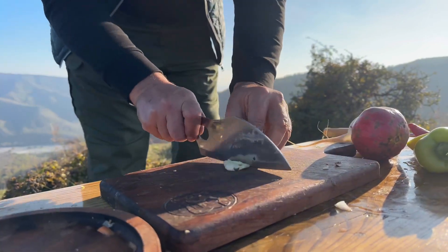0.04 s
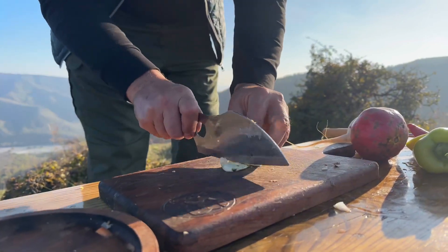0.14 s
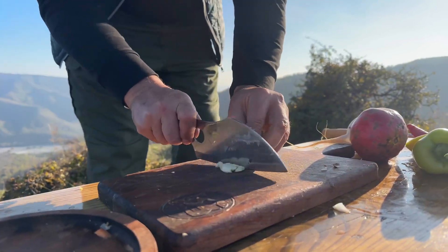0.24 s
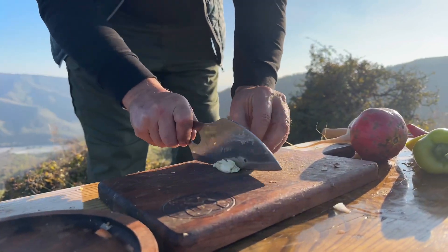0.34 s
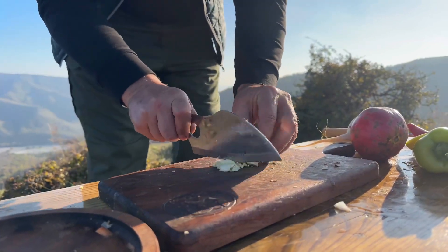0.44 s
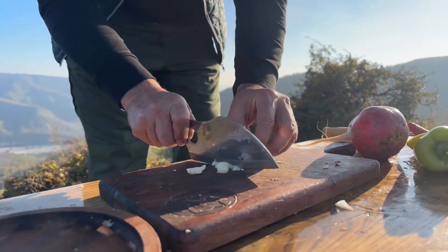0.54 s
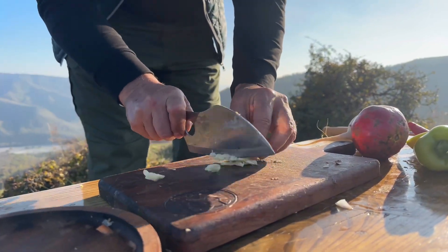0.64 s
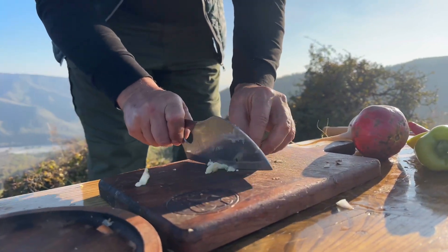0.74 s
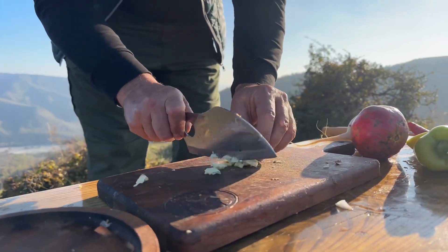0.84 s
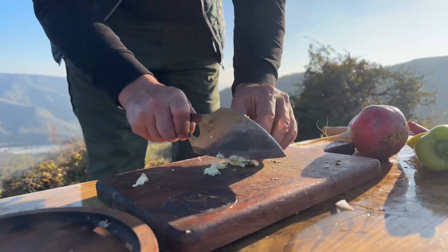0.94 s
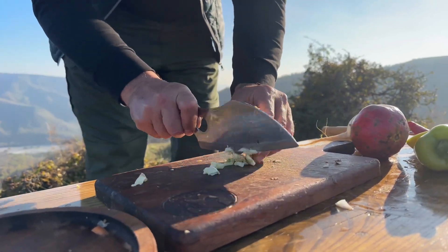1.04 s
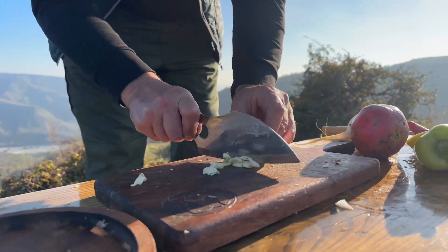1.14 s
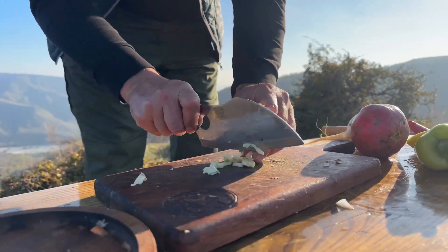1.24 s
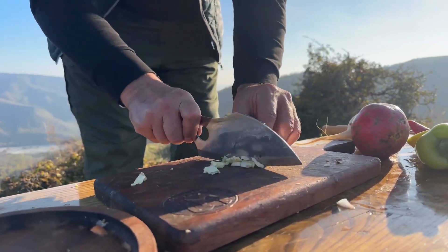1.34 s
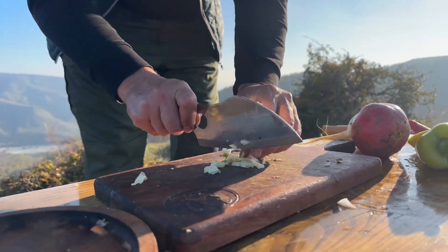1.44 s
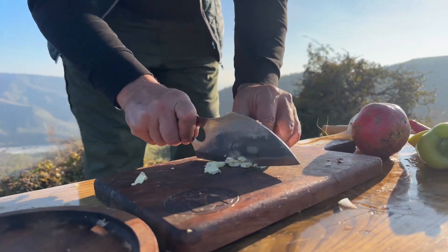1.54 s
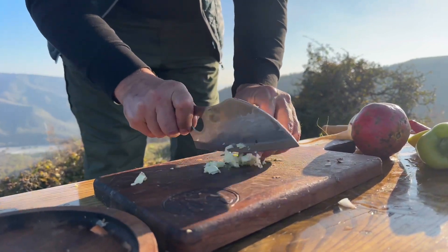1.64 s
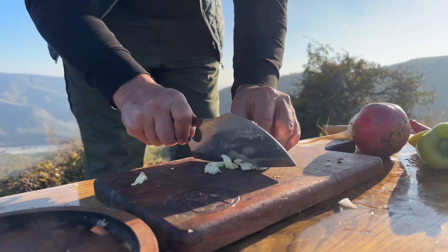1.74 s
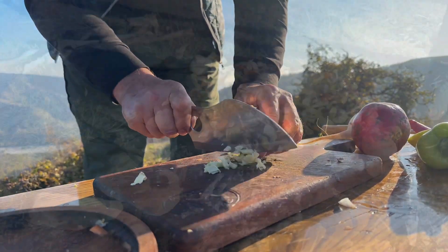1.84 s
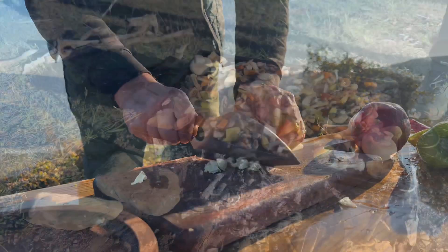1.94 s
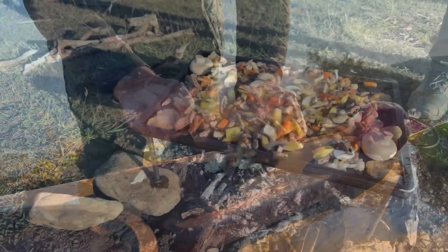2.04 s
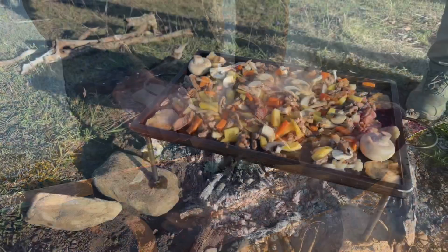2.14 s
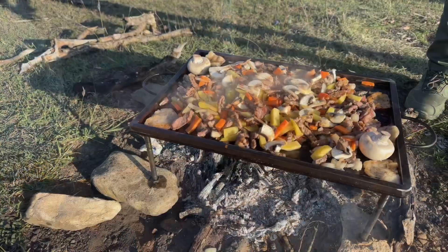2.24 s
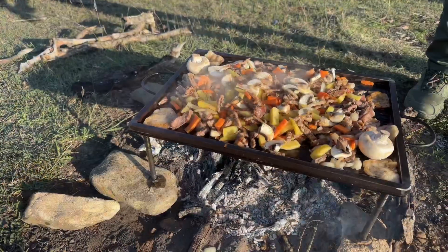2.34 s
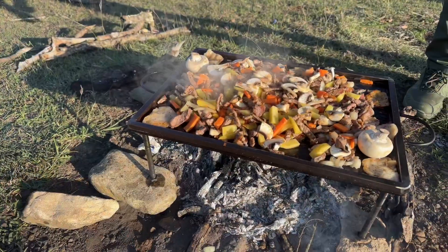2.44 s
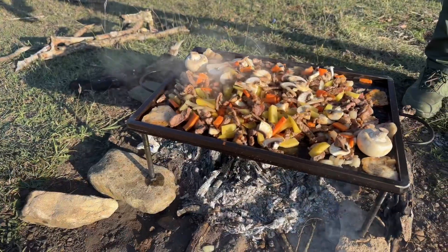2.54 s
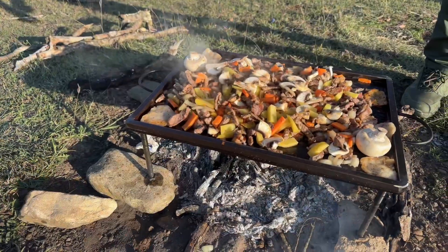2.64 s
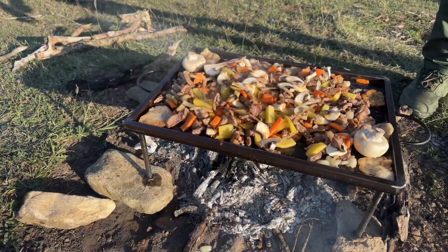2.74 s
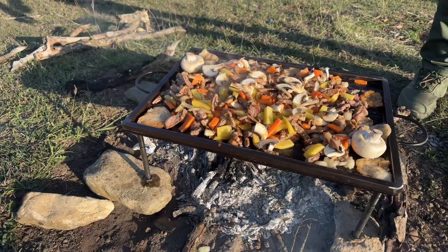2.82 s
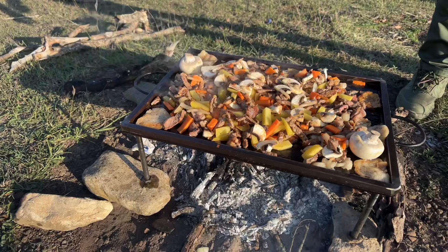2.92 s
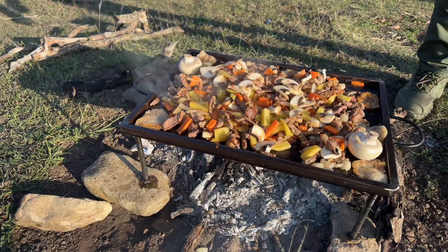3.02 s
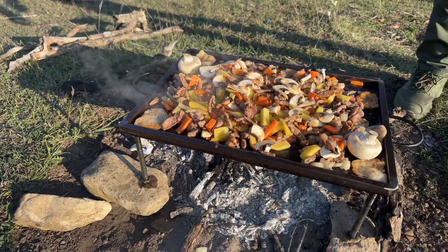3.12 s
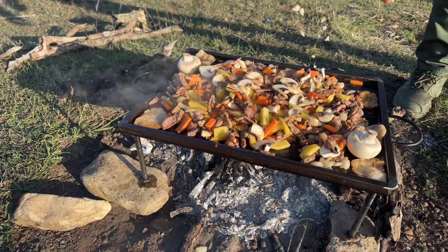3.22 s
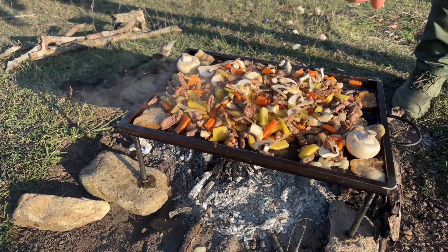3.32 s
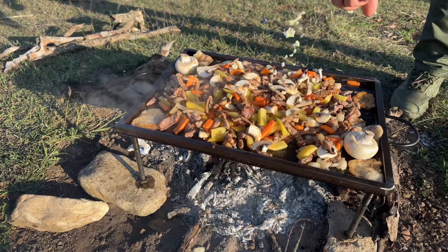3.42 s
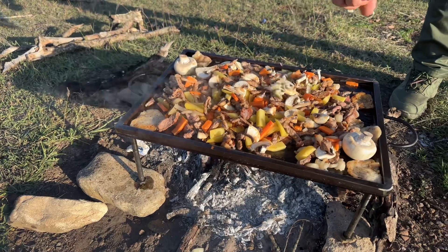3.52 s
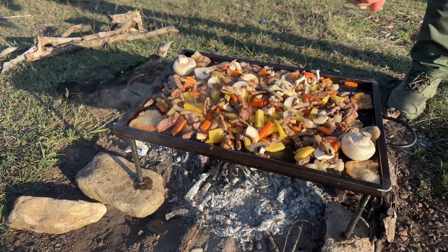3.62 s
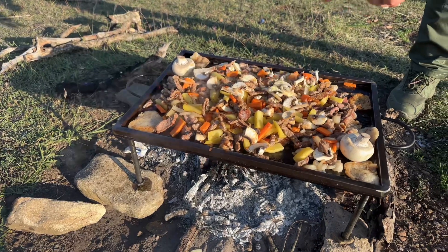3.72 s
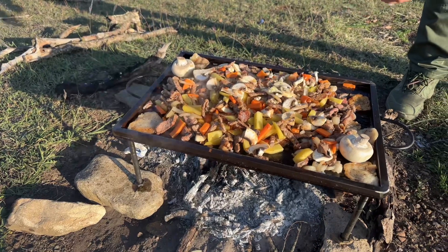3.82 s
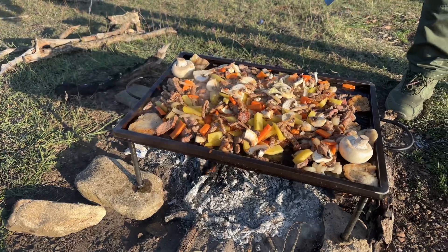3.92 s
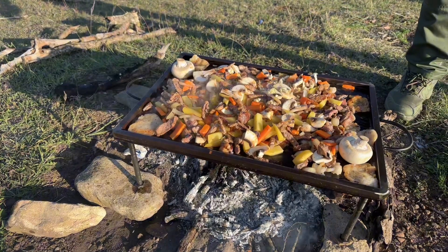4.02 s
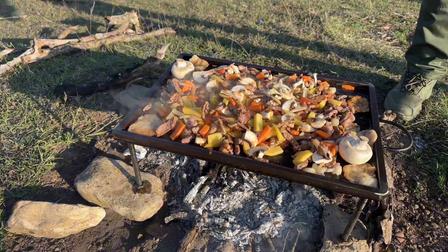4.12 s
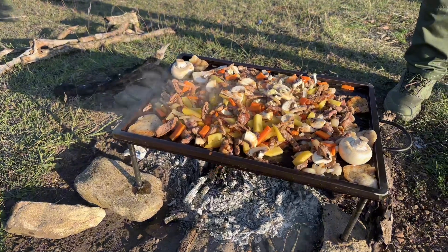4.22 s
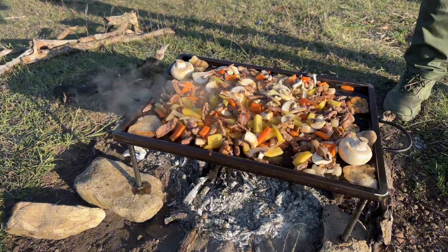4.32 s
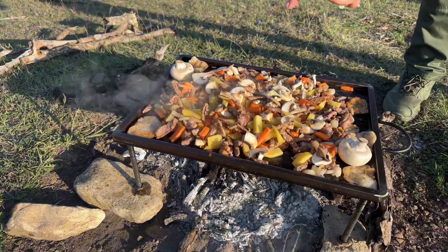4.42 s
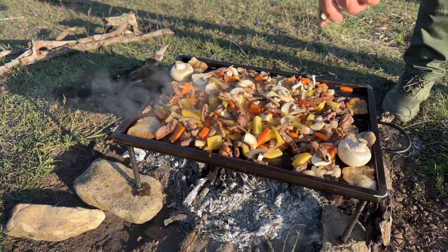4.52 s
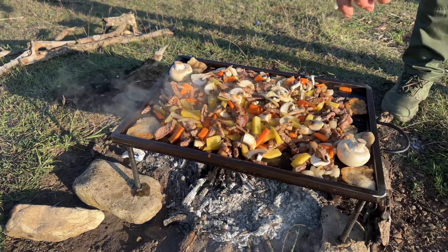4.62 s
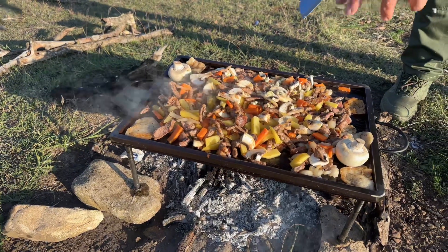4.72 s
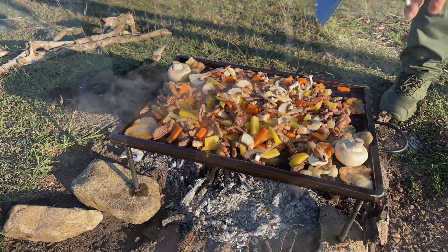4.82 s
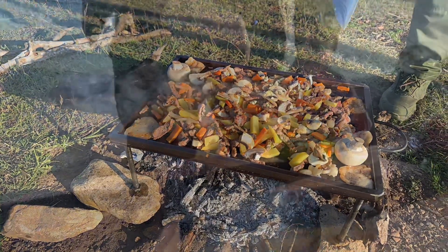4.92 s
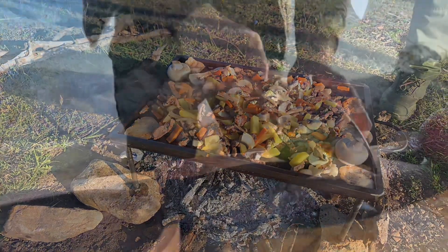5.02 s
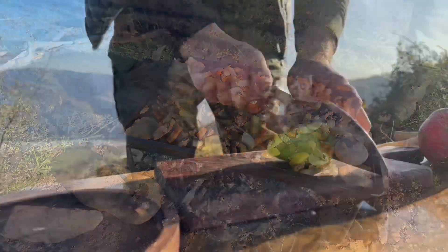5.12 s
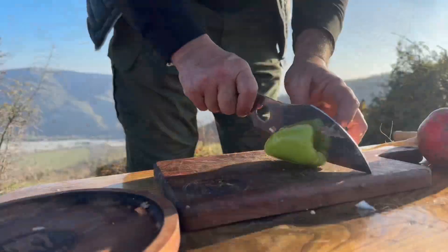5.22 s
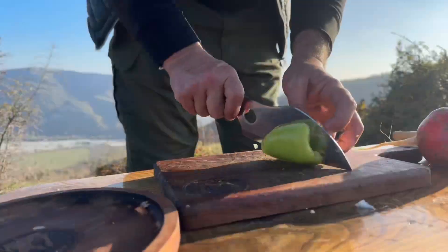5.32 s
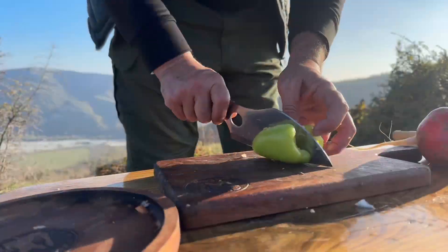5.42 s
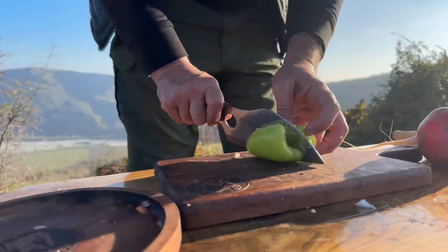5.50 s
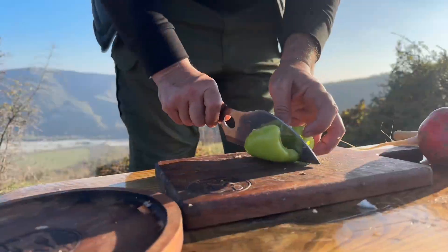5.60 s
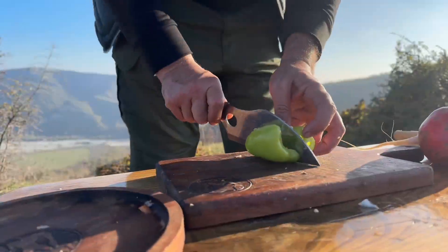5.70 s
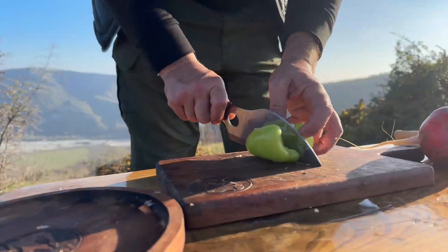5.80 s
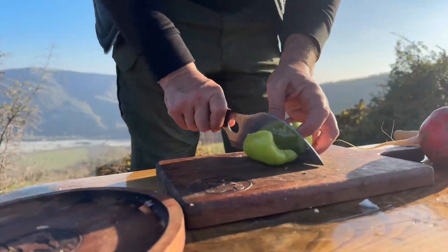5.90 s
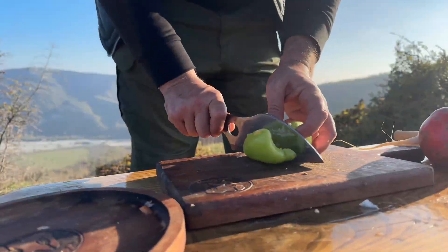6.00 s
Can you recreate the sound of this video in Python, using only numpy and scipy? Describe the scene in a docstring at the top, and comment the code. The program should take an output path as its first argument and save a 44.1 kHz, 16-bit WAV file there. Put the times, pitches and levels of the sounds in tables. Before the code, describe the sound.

Outdoors, close to the microphone, with soft low wind and a faint engine droning far away. From 0.2 to 2.2 seconds a broad knife chops garlic on a thick wooden board: eleven quick, dry knocks roughly 0.2 seconds apart, uneven in force, with small crunches, board rattle and a brief blade ring. Faint hiss lies between them. Around 2.1 the sizzle of food on a hot iron tray enters abruptly, bright and dense, and holds until 5.3, with sharp spits clustered from 2.4 to 2.8 and scattered after. Wind thumps near 2.1-2.3, 3.8 and 4.1. At 5.1 a single loud, duller board knock sounds through the sizzle. Once the sizzle stops, a blade saws a hollow pepper: gritty rasp and snaps at 5.3-5.5, a faint tap and scrape near 5.8, then a crisp snap and rasp at 5.95 to the end.

```python
"""Outdoors on a hillside: wind buffets the microphone and an engine drones far down the valley.
A broad knife chops garlic on a thick wooden board: splitting noise, decaying board modes, rattle, blade ring.
Food sizzles on an iron tray: filtered noise for dense bubbles, with short decaying tones for louder spits.
The knife then saws into a hollow pepper: gritty friction noise and snaps excite resonances of hollow and blade.
Wind is shaped noise with swirls falling in pitch; the engine is a few sine orders of a gliding firing rate."""
import sys
import numpy as np
from scipy import signal
from scipy.fft import rfft, irfft, next_fast_len
from scipy.io import wavfile
from scipy.ndimage import uniform_filter1d, map_coordinates

SR = 44100
rng = np.random.default_rng(int(sys.argv[2]) if len(sys.argv) > 2 else 0)


def waveform_to_disk(signal):
    """Save audio, clipped to [-1, 1], as 16-bit WAV at the path in sys.argv[1]."""
    frames = np.transpose(np.atleast_2d(signal))
    scaled = np.clip(frames, -1, 1) * 32767
    samples = np.round(scaled).astype(np.int16)
    wavfile.write(sys.argv[1], SR, samples)


N = 267069
TIME = np.arange(N) / SR  # s

# In every spectrum table the levels are relative, per Hz.
# Wind strength: start_s, strength_db
WIND_STRENGTH = [(0.0, -54.5), (1.15, -58), (1.62, -47), (1.88, -50.5), (2.1, -43), (2.2, -43.5),
                 (2.32, -31), (2.36, -52.5), (3.25, -55.5), (3.34, -42), (3.72, -52.5), (3.84, -39),
                 (3.98, -46), (4.11, -37.5), (4.18, -49), (4.95, -49), (5.5, -61.5), (5.83, -53),
                 (5.89, -49), (6.06, -65)]
# Spectrum of the wind's rumble: frequency_hz, level_db
RUMBLE_SPECTRUM = [(25, -26.5), (42, -5.5), (75, 1.5), (103, -5.5), (130, -5), (167, -12), (200, -12.5),
                   (260, -49), (440, -120)]
# Spectrum of the flutter above it: frequency_hz, level_db
FLUTTER_SPECTRUM = [(59, -29), (100, 15), (288, -4), (448, -13), (486, -18.5), (829, -38.5), (900, -32),
                    (1170, -57), (1980, -120)]
# Eddies bursting on the microphone port: start_s, peak_db, rise_s
EDDIES = [(1.242, -48, 0.0093), (1.308, -43.5, 0.0086), (1.673, -46.5, 0.0055), (1.711, -37.5, 0.0093),
          (1.91, -40, 0.0094), (2.031, -43, 0.0067), (2.212, -42.5, 0.0076), (2.25, -37.5, 0.0084),
          (2.281, -38.5, 0.0079), (2.063, -33.5, 0.018), (2.112, -32.5, .02), (2.316, -33.5, 0.0072),
          (3.341, -45.5, 0.0061), (3.55, -44, 0.0083), (3.647, -47.5, 0.0072), (3.796, -35.5, 0.0065),
          (3.854, -44, 0.0082), (4.063, -43, 0.0039), (4.073, -29.5, .018), (4.097, -31.5, 0.00495),
          (4.104, -30, 0.0049), (4.108, -28.5, 0.01215), (4.546, -47, 0.0084), (5.872, -38.5, 0.023)]
# Engine: start_s, firing_order_hz, firing_order_db, order_8_5_db (the order at 8/5 of the firing order)
ENGINE_COURSE = [(0, 74, -61.5, -64.5), (1.2, 76, -57.5, -62), (2.3, 76, -51.5, -65),
                 (2.34, 62.5, -48, -66), (2.77, 68, -43.5, -51.5), (3.3, 72.7, -46.5, -55),
                 (3.6, 76, -46, -70), (4.7, 80, -54.5, -57), (5.1, 81, -51, -54), (5.5, 81, -61.5, -59),
                 (6.06, 79, -58, -59.5)]
# Weaker engine orders: multiple_of_firing_order, level_db (relative to the firing order)
WEAK_ORDERS = [(0.598, -14.5), (2, -18.5), (2.2, -21.5)]
# Faint hiss between chops: start_s, level_db
HISS_LEVEL = [(0.0, -76.5), (0.44, -73.5), (0.99, -73), (2.12, -70)]
# Spectrum of that hiss: frequency_hz, level_db
HISS_SPECTRUM = [(400, -60), (700, -20), (1300, -23.5), (2000, -20), (2550, -15), (3100, -18.5),
                 (3500, -18), (4900, -16), (5600, -16.5), (6400, -16.5), (8200, -27), (12500, -29.5),
                 (15000, -27), (15800, -28)]
# Chops: start_s, blow_db (relative), edge_click_db, contact_hardness_hz, crunch_db, crunch_lead_s
CHOP_BLOWS = [(0.2246, -28, -66, 1750, -51, 0.0057), (0.4031, -24, -48, 1620, -69, 0.0018),
              (0.583, -38.5, -45.5, 1030, -53.5, 0.017), (0.755, -24, -45, 1640, -66, .002),
              (0.9518, -33.5, -63, 1140, -62, 0.0023), (1.1423, -52, -43.5, 1800, -61, 0.0083),
              (1.345, -26.5, -60, 1780, -50.5, 0.008), (1.569, -31, -68, 1180, -51.5, 0.011),
              (1.757, -25.5, -62, 1770, -54.5, 0.0054), (1.976, -24.5, -51, 1600, -50, 0.0048),
              (2.159, -29, -48, 2570, -66, 0.0054), (5.096, -26, -66, 470, -70, .004),
              (5.762, -49, -66, 584, -63, 0.0078)]
# Modes of the board on its table: pitch_hz, level_db (relative), t60_s
BOARD_MODES = [(225, -6.5, 0.23), (353, -3.5, 0.098), (468.6, -11.5, 0.15), (554, -47, 0.26),
               (587, -10.5, 0.14), (750, -10, 0.098), (891, 7.5, 0.045), (925, -43, 0.077),
               (1130, -29, 0.21), (1344, 5, 0.031), (1516, -12.5, 0.041), (1892, 2.5, 0.024),
               (2060, 4.5, 0.013), (2242, 4.5, 0.04), (2504, -7, 0.041), (2800, -6.5, 0.061),
               (3260, -3, 0.043)]
# Spectrum of the board rattling on the table: frequency_hz, level_db
RATTLE_SPECTRUM = [(88, -72), (150, 3), (899, 8), (2070, -8.5), (2300, 5), (2490, -24), (3240, -3.5),
                   (6000, -34), (7800, -91), (13200, -120)]
# Spectrum of garlic splitting: frequency_hz, level_db
SPLITTING_SPECTRUM = [(470, -84), (800, -10), (1270, -15), (2070, 2.5), (2720, -4), (3580, -4.5),
                      (5330, -3.5), (15800, -15)]
# Sizzle: start_s, level_db
SIZZLE_LEVEL = [(2.114, -42), (2.14, -49), (2.17, -47), (2.23, -42), (4.63, -43), (4.8, -45), (4.94, -41.5),
                (5.316, -44)]
# Spectrum of the sizzle: frequency_hz, level_db
SIZZLE_SPECTRUM = [(150, -41), (250, -17), (319, -22.5), (406, -15.5), (459, -22.5), (696, -13),
                   (1250, -18.5), (1630, -15.5), (1810, -14), (3320, 0.5), (4860, -4), (6640, -4.5),
                   (9230, -11.5), (11400, -11.5), (15800, -18)]
# Loudest fat pops: start_s, level_db, pitch_hz, treble_spray_db (relative to the pop)
LOUD_SPITS = [(2.393, -20, 3130, -16), (2.4615, -20, 3150, -19), (2.5322, -16, 3190, -20),
              (2.5876, -19.5, 3550, -4), (2.5935, -25, 2816, -17), (2.6897, -18.5, 4380, -14),
              (2.7316, -25, 3050, -19), (2.758, -23, 2800, -20), (3.0516, -25, 3430, -23),
              (3.2739, -30, 3100, -8), (3.6605, -20, 3820, -38), (3.6903, -17.5, 3250, -25),
              (4.0092, -24.5, 3980, -6), (4.1418, -19, 4320, -14), (4.2022, -19.5, 3400, -7),
              (4.4386, -23.5, 3800, -18), (4.679, -22, 3605, -10)]
# Three strokes of the knife in the pepper: start_s, skin_rasp_db, hollow_db
SAW_STROKES = [(4.82, -75, -78), (4.95, -64, -53), (5.3, -46.5, -54.5), (5.35, -53, -55.5),
               (5.41, -46.5, -51), (5.45, -59.5, -60), (5.465, -60, -75), (5.6, -57.5, -72),
               (5.72, -61, -77), (5.762, -54.5, -65), (5.778, -66.5, -88), (5.828, -58, -81),
               (5.842, -57.5, -67.5), (5.96, -47, -56), (6.02, -51.5, -71), (6.06, -52, -74)]
# Spectrum of the skin rasp: frequency_hz, level_db
SKIN_SPECTRUM = [(240, -8.5), (400, -1.5), (707, -6), (961, -23), (1290, -11), (1460, -8), (2240, -3.5),
                 (2740, -16), (2950, -1), (3240, 2), (4760, -1.5), (7320, -6), (10400, -3.5), (13100, -15),
                 (15800, -3.5)]
# Resonances, the hollow in the first two rows and the blade in the rest: centre_hz, width_hz, level_db
PEPPER_MODES = [(985, 270, 0), (1550, 380, -10), (2720, 170, 0), (3290, 300, -8), (4300, 900, -14)]
# Breaking fibres: start_s, level_db, hollow_db, treble_db (the last two relative to the snap)
FIBRE_SNAPS = [(5.374, -51, -15, 15.5), (5.4112, -38, -8, -16), (5.4302, -32.5, -1, -21),
               (5.441, -41, -24, -5), (5.4444, -40, -8, -6), (5.5007, -54, 1.5, 3), (5.521, -53, -8, 3),
               (5.571, -48, -22, -4), (5.68, -52.5, -10, 5), (5.839, -45.5, -23, 5),
               (5.9403, -34, -6, 10.5), (5.973, -46, -10, -16)]

HOLLOW_MODES, BLADE_MODES = PEPPER_MODES[:2], PEPPER_MODES[2:]
FLUTTER_DB, FLUTTER_GROWS = -24, 0.7  # the flutter swings less than the rumble, 0.7 dB per dB
EDDY_TURNS, EDDY_ROUGH_DB = 2.3, -9  # scales the swirl's turning per rise time; noise under the swirl
BLADE_HZ, LIFT_S, HELD_S = 1097, .045, .055  # the blade rings once it lifts off, until the grip damps it
# the ring grows faster than the blow (dB per dB), and with hardness around 1.6 kHz
BLADE_DB, BLADE_GROWS, BLADE_DB_PER_OCT = -19.5, 1.73, 6
JUICE_DB, JUICE_DB_PER_S = -57.5, -8  # wet low hiss: level at the start, fade
STEEL_DB = -8  # the blade sings under the rasp
TOP_HZ = 15800


def amp(db):
    """Logarithmic level: decibels to gain."""
    return 10 ** (np.asarray(db) / 20)


def unit(x):
    """Normalisation of power: scaled to rms 1."""
    return x / np.sqrt(np.mean(x ** 2) + 1e-20)


def curves(rows):
    """Linear interpolation: one value per sample for each column after the time."""
    s, *cols = np.transpose(rows)
    return [np.interp(TIME, s, c) for c in cols]


def levels(rows):
    """Envelopes: gains of the dB columns, silent outside the table's span."""
    return [amp(c) * (TIME > rows[0][0]) * (TIME < rows[-1][0]) for c in curves(rows)]


def wobble(rate):
    """Slow modulation: a smooth random curve, rate knots a second."""
    knots = rng.standard_normal(int(N * rate / SR) + 4)
    return map_coordinates(knots, [np.arange(N) * rate / SR])


def filtered(x, response):
    """Linear filtering: the spectrum of x times a response of frequency."""
    m = next_fast_len(len(x) + 8192)
    return irfft(rfft(x, m) * response(np.fft.rfftfreq(m, 1 / SR)), m)[:len(x)]


def coloured(x, points):
    """Spectral shaping: x given a spectrum interpolated over log frequency, rms 1."""
    f, db = np.transpose(points)
    return unit(filtered(x, lambda hz: amp(np.interp(np.log(hz + 1), np.log(f), db))))


def resonances(modes):
    """Modal superposition: causal resonances, squared for steep skirts."""
    return lambda f: sum(amp(db) * (1j * f * w / (c * c - f * f + 1j * f * w)) ** 2 for c, w, db in modes)


def gritty(per_s, spread_db, smooth):
    """Shot noise: sparse clicks of uneven size in a share of white noise."""
    size = amp(spread_db * np.minimum(rng.exponential(size=N), 3))
    clicks = (rng.random(N) < per_s / SR) * size * rng.choice([-1, 1], size=N)
    return smooth * rng.standard_normal(N) + unit(clicks)


def patchy(x, depth_db, size):
    """Short-time modulation: random patches of gain over time and frequency."""
    z = signal.stft(x, nperseg=256)[2]
    field = uniform_filter1d(rng.standard_normal(z.shape), size=5, axis=0)
    field = uniform_filter1d(field, size=size, axis=1)
    return signal.istft(z * amp(depth_db * unit(field)), nperseg=256)[1][:N]


def add(track, s, sound):
    """Superposition: mixes a sound into the track at time s."""
    piece = track[round(s * SR):][:len(sound)]
    piece += sound[:len(piece)]


def wind():
    """Turbulence on the port: a lumpy rumble, a flutter above it and single eddies that fall in pitch."""
    strength_db, = curves(WIND_STRENGTH)
    rumble = amp(4.8 * wobble(14)) * coloured(rng.standard_normal(N), RUMBLE_SPECTRUM)
    flutter = amp(3.2 * wobble(30)) * coloured(rng.standard_normal(N), FLUTTER_SPECTRUM)
    out = amp(strength_db) * unit(rumble)
    out += amp(FLUTTER_DB + FLUTTER_GROWS * strength_db) * unit(flutter)
    for s, db, rise in EDDIES:
        u = np.arange(round(7 * rise * SR)) / SR / rise  # time in rises
        swirl = np.sin(2 * np.pi * EDDY_TURNS * (0.275 * u + 1.378 * (1 - np.exp(-.45 * u))))
        edge_hz = 1.16 * EDDY_TURNS / rise  # small, quick eddies reach higher
        rough = unit(filtered(rng.standard_normal(len(u)),
                              lambda hz: hz / 100 / (1 + hz / 100) / (1 + (hz / edge_hz) ** 5)))
        add(out, s, amp(db) * u * np.exp(1 - u) * (swirl + amp(EDDY_ROUGH_DB) * rough))
    return out


def engine():
    """Harmonic orders of a periodic source: a few low ones, wavering with the air between."""
    hz, main_db, upper_db = curves(ENGINE_COURSE)
    phase = 2 * np.pi * np.cumsum(hz * (1 + 0.0066 * wobble(8))) / SR
    orders = [(1, main_db), (8 / 5, upper_db)] + [(k, main_db + db) for k, db in WEAK_ORDERS]
    out = np.zeros(N)
    for k, db in orders:
        tone = np.sin(k * phase + rng.uniform(0, 2 * np.pi))
        out += np.sqrt(2) * amp(db + 1.5 * wobble(9)) * tone
    return out


def faint_hiss():
    """Amplitude-modulated noise: a faint, patchy hiss under the chopping that dips just after each blow."""
    dip_db = sum(-5 * (TIME > s) * np.exp(-((TIME - s) / 0.054) ** 2) for s, *_ in CHOP_BLOWS)
    hiss = patchy(gritty(per_s=1000, spread_db=-10, smooth=10.0), depth_db=3.0, size=10)
    return levels(HISS_LEVEL)[0] * amp(dip_db + 2.5 * wobble(31.0)) * coloured(hiss, HISS_SPECTRUM)


def board_knock(t, hard_hz):
    """Modal impact: a blow rings and rattles the board, and a soft contact excites less treble."""
    ring = np.zeros(len(t))
    for k, (hz, level, t60) in enumerate(BOARD_MODES):
        level += rng.normal(0, 2.5)  # dB; each blow lands on a new spot
        mode = amp(level - 60 * t / t60) * np.sin(2 * np.pi * hz * t)
        ring += (-1) ** k * mode / (1 + (hz / hard_hz) ** 2)
    # the rattle decays in two stages
    rattle = coloured(rng.standard_normal(len(t)), RATTLE_SPECTRUM)
    rattle *= amp(6.5 - 60 * t / 0.067) + amp(-17.5 - 60 * t / 0.17)
    rattle = filtered(rattle, lambda hz: 1 / (1 + 1j * hz / hard_hz) ** 2)
    # the board gives under the blow
    push = -amp(10.0) * np.exp(-((t - .0012) / 0.000089) ** 2) / (1 + (1100 / hard_hz) ** 2)
    return (1 - np.exp(-t / 0.00096)) * (ring + rattle + push)


def chops():
    """Fracture, then impact: the edge crunches through the clove and strikes the board; the blade rings."""
    out, t = np.zeros(N), np.arange(SR // 3) / SR
    crunch = coloured(gritty(per_s=3000, spread_db=4, smooth=.8), SPLITTING_SPECTRUM)
    free = np.exp(-(t / HELD_S) ** 1.5) / (1 + np.exp((LIFT_S - t) / .006))
    blade = np.sin(2 * np.pi * BLADE_HZ * t) * free / free.max()
    for s, db, click_db, hard_hz, crunch_db, lead in CHOP_BLOWS:
        add(out, s, amp(db - 8) * board_knock(t, hard_hz))
        blade_db = BLADE_DB + BLADE_GROWS * db + BLADE_DB_PER_OCT * np.log2(hard_hz / 1600)
        add(out, s, amp(blade_db) * blade)
        # the splitting lasts from the first touch until just after the blow
        cut = crunch[round((s - lead) * SR):][:len(t)]
        since = t[:len(cut)]
        decay = amp(crunch_db - 60 * np.maximum(since - lead, 0) / 0.041)
        add(out, s - lead, cut * (1 - np.exp(-since / 0.00041)) * decay)
        click = coloured(rng.standard_normal(len(t)), SPLITTING_SPECTRUM)
        add(out, s, click * amp(click_db - 60 * t / 0.012))
    return out


def fat_spits():
    """Damped bubble oscillation: each pop is a short decaying tone with a burst of treble spray."""
    t, pops = np.arange(SR // 80) / SR, np.zeros(N)
    draw = rng.standard_normal(size=(2200, 3))
    small_s = rng.uniform(2.2, SIZZLE_LEVEL[-1][0], len(draw))
    small_db = -45 + 2.06 * draw[:, 0] ** 2 / (1 + np.abs(draw[:, 0]) / 3)  # a few stand well out
    small_hz = 3500 * np.exp(0.284 * draw[:, 1])
    small = np.column_stack([small_s, small_db, small_hz, -9 + 4 * draw[:, 2]])
    for s, db, hz, treble_db in [*LOUD_SPITS, *small]:
        # falls 60 dB in 13 cycles
        bubble = np.sin(2 * np.pi * hz * t) * amp(-60 * t * hz / 13) * (1 - np.exp(-t / 0.000096))
        spray = amp(treble_db - 60 * t / 0.0035) * rng.standard_normal(len(t))
        add(pops, s, amp(db) * (bubble + spray))
    # bubbles this small radiate no bass
    return filtered(pops, lambda hz: (1j * hz / 1600 / (1 + 1j * hz / 1600)) ** 2)


def sizzle():
    """Boiling noise: water boils off under hot fat as dense bursting bubbles, with louder spits."""
    level, = levels(SIZZLE_LEVEL)
    hiss = patchy(gritty(per_s=2500, spread_db=-1, smooth=1.0), depth_db=1.5, size=2)
    out = level * amp(0.36 * wobble(45) + 0.3 * wobble(6)) * coloured(hiss, SIZZLE_SPECTRUM)
    # a wetter, lower hiss at first, fading as the juice boils away
    juice_db = JUICE_DB + JUICE_DB_PER_S * (TIME - SIZZLE_LEVEL[0][0])
    juice = unit(filtered(hiss, resonances([(1890, 2100, 0)])))
    out += (level > 0) * amp(juice_db) * juice
    return out + fat_spits()


def fibre_snaps():
    """Impulsive excitation: each breaking fibre sends a short noise burst through blade, hollow and skin."""
    out, t = np.zeros(N), np.arange(SR // 20) / SR
    for s, db, hollow_db, treble_db in FIBRE_SNAPS:
        burst = rng.standard_normal(len(t)) * amp(-60 * t / 0.018) * (1 - np.exp(-t / 0.00085))
        high = filtered(burst, resonances(BLADE_MODES))
        low = filtered(burst, resonances(HOLLOW_MODES))
        crack = coloured(burst, SKIN_SPECTRUM)
        snap = high / np.abs(high).max()
        snap += amp(hollow_db) * low / np.abs(low).max()
        snap += amp(treble_db) * crack / np.abs(crack).max()
        add(out, s, amp(db) * snap)
    return out


def pepper():
    """Friction driving resonators: the blade rasps through skin, ringing the hollow and the blade."""
    rasp, hollow = levels(SAW_STROKES)
    rub = amp(1.1 * wobble(70)) * gritty(per_s=1000, spread_db=7, smooth=1.45)
    # the same grains heard directly, with random signs
    out = rasp * coloured(rub * rng.choice([-1, 1], size=N), SKIN_SPECTRUM)
    out += hollow * unit(filtered(rub, resonances(HOLLOW_MODES)))
    out += amp(STEEL_DB) * rasp * unit(filtered(rub, resonances(BLADE_MODES)))
    return out + fibre_snaps()


def scene():
    """Superposition at one point: one microphone feeds both channels."""
    mono = wind() + engine() + faint_hiss() + chops() + sizzle() + pepper()
    return np.array([mono, mono])


def record(dry):
    """Band limitation: nothing is kept above the limit."""
    return np.array([filtered(ch, lambda hz: hz < TOP_HZ) for ch in dry])


dry = scene()
out = record(dry)
waveform_to_disk(out)
```